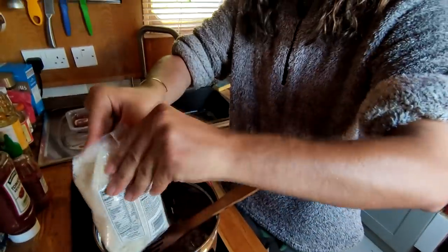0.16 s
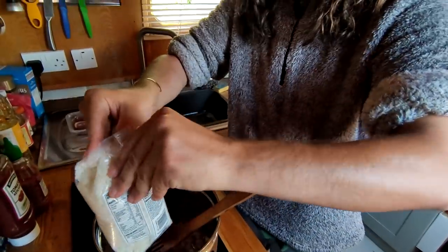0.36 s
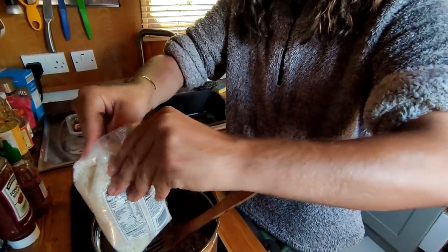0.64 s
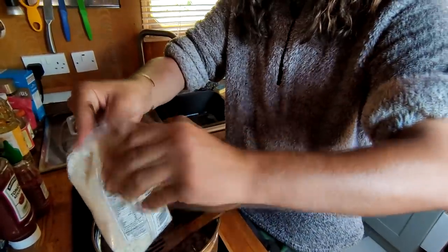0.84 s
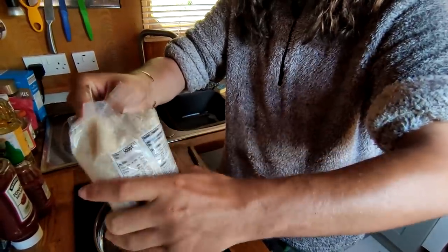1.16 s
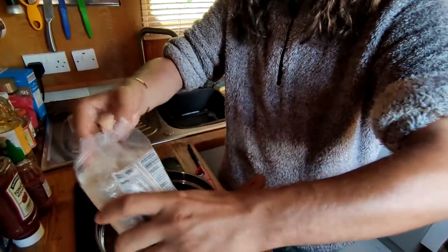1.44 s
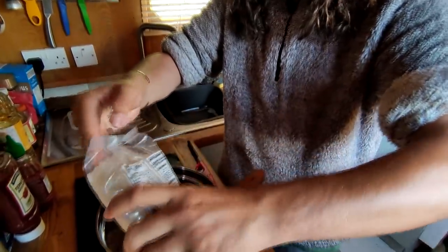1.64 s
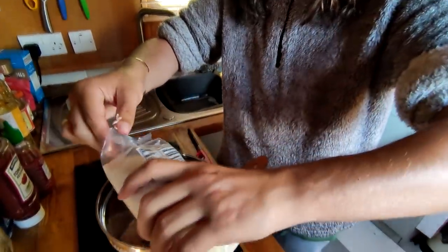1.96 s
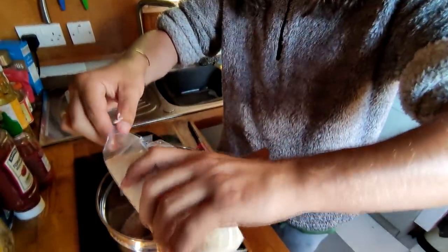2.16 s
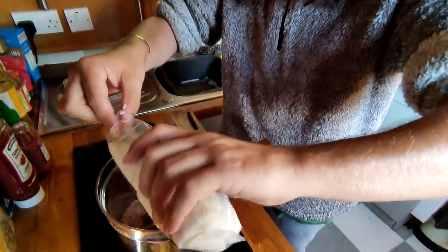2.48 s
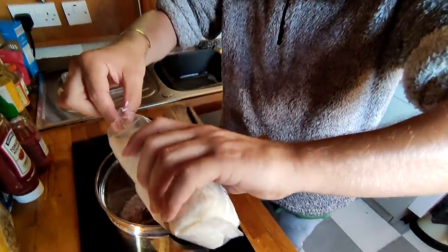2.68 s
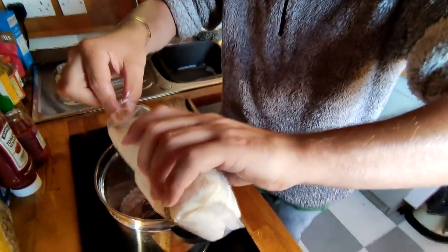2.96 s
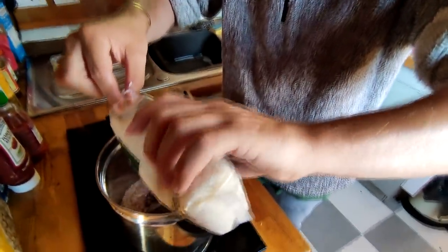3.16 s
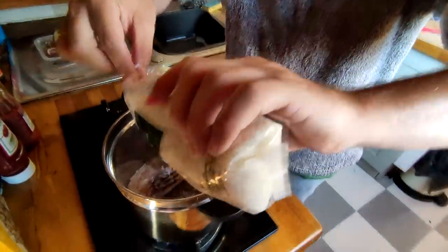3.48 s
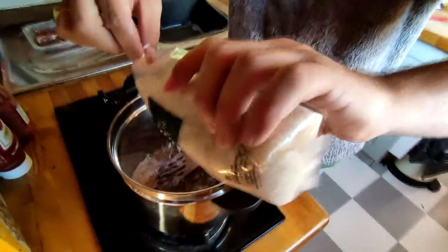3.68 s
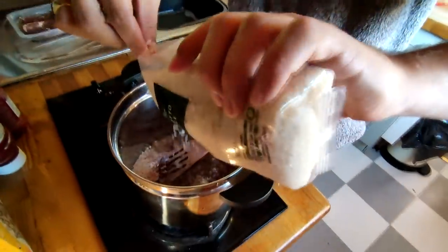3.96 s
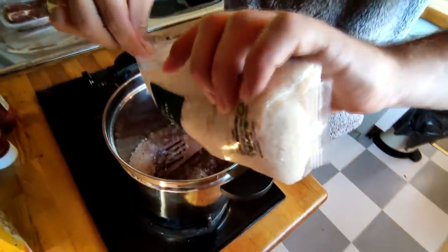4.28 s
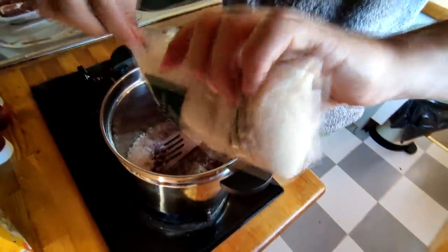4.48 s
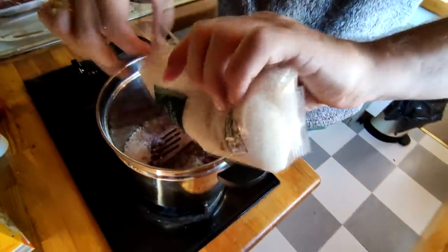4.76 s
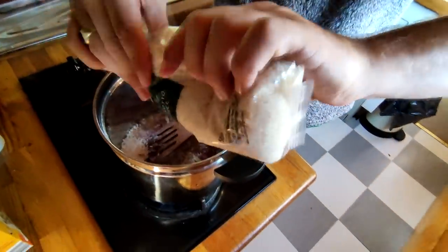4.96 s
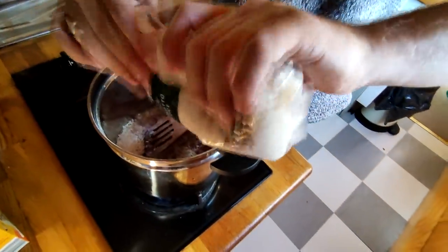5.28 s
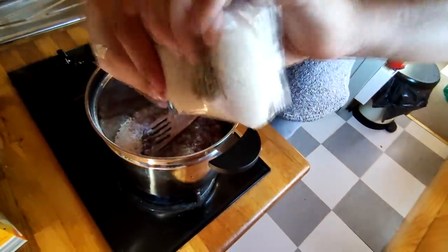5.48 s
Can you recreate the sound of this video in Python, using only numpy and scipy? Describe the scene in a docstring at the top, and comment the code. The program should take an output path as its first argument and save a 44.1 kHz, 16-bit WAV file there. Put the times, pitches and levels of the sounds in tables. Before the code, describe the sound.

Close kitchen frying hiss with spurts of hot fat, soft bag pops, a rush of rice grains, then loud crinkling plastic.

```python
"""Rice into a pot of frying onions

Heard close by in a small kitchen: rice is tipped from a plastic bag into a steel pot where onions fry.
Clouds of random clicks make the fat sizzle, flare in spurts and ring the pot, and the grains patter in.
Short damped resonances make the film buckle softly at first, then snap as the bag is gripped and lifted;
clumped clicks make it rustle. Room tone and short reflections lie around it, on two unlike ports."""
import sys
import numpy as np
from scipy import signal
from scipy.fft import rfft, irfft, next_fast_len
from scipy.io import wavfile

SR = 44100
rng = np.random.default_rng(int(sys.argv[2]) if len(sys.argv) > 2 else 0)


def log_audio(samples):
    """Write samples as a 16-bit WAV file to the path given in sys.argv[1]."""
    # one column per channel
    frames = np.atleast_2d(samples).T
    # limit to full scale, then quantise
    limited = np.clip(frames, -1, 1)
    pcm = np.round(limited * 32767).astype(np.int16)
    wavfile.write(sys.argv[1], SR, pcm)


N = 247842

# All levels in these tables are relative, unless said otherwise.
# Steady frying in the fat. Each row: time in seconds, level in dB.
FRYING = [(0.0, -34), (0.6, -36), (1.3, -30.5), (1.9, -37), (2.25, -31.5), (2.5, -34), (2.8, -31.5),
          (3.3, -31.5), (3.8, -29), (4.4, -30), (4.65, -39.5), (4.95, -32), (5.2, -31.5), (5.62, -30.5)]
# Larger spurts as something wet meets hot fat. Each row: start in seconds, level in dB,
# decay by 60 dB in seconds, extra level of the lower band (body) in dB.
FLARES = [(0.328, -25.5, 0.59, -3), (0.345, -21, 0.066, -2), (0.449, -26.5, 0.3, 0.5),
          (0.528, -33, 0.97, 9.5), (0.575, -26.5, 0.28, 4.5), (0.781, -23.5, 0.31, -3.5),
          (0.898, -29, 0.41, -2), (0.907, -18.5, 0.14, -4.5), (0.924, -28.5, 0.24, 8.5),
          (1.006, -31, 0.28, 7), (1.078, -40, 0.16, -7), (1.152, -28.0, 0.7, -13), (1.167, -33, 0.25, 5),
          (1.196, -20, 0.098, -11), (1.257, -28.5, 0.3, 7), (1.319, -33.0, 0.47, 9),
          (1.333, -31.5, 0.23, 9.5), (1.464, -28.5, 0.27, 3), (1.605, -29, 0.7, -5.5),
          (1.722, -23.5, 0.39, -8.5), (1.874, -36, 0.11, -9), (1.94, -31.5, 0.78, -11),
          (2.068, -33.5, 0.21, -12), (2.081, -28.5, 0.32, -22), (2.109, -31, 0.44, -14),
          (2.133, -22.5, 0.1, -19), (2.18, -24, 0.22, -1), (2.303, -29, 0.11, -3), (2.338, -33, 0.13, 4),
          (2.375, -27, 0.37, -8), (2.425, -26, 0.12, -8), (2.528, -32, 0.7, -9), (2.552, -26.5, 0.7, -2),
          (2.577, -28, 0.5, 3), (2.626, -28, 0.77, 1.5), (2.652, -25, 0.4, 1.5), (2.685, -27, 0.17, -1),
          (2.741, -26.0, 0.82, -1.5), (2.793, -27, 0.1, -1), (2.864, -30, 0.2, -8), (2.897, -27.5, 0.78, 1),
          (2.927, -28, 0.47, 0.5), (2.976, -24.0, 0.7, -11), (2.988, -21.5, 0.44, -8),
          (3.005, -25.5, 0.21, -1), (3.075, -24, 0.43, -12), (3.1, -25, 0.52, -7.5),
          (3.171, -22.0, 0.1, -11), (3.219, -24, 0.17, -4), (3.287, -28, 0.13, -10),
          (3.315, -28.5, 0.55, -5), (3.394, -24, 0.063, -17), (3.428, -28, 0.26, -9),
          (3.472, -27.0, 0.17, -8), (3.496, -29, 0.37, -9), (3.53, -22.5, 0.08, -7),
          (3.572, -34.0, 0.33, -2), (3.6, -28.5, 0.52, 4), (3.632, -28.5, 0.17, 4), (3.66, -31, 0.27, 6.5),
          (3.707, -26.5, 0.25, -4), (3.725, -27.5, 0.24, 2), (3.766, -26.5, 0.32, 3),
          (3.796, -24, 0.22, -1), (3.812, -26.0, 0.21, -1), (3.844, -24.5, 0.13, 3.5),
          (3.907, -25.5, 0.19, 2.5), (3.927, -26.0, 0.22, -7), (3.957, -26, 0.24, -4),
          (4.019, -32, 0.22, 7), (4.037, -31.0, 0.16, 2), (4.065, -32.5, 0.48, 7),
          (4.083, -30.5, 0.67, 9.5), (4.117, -26.5, 0.22, 3), (4.19, -25, 0.21, 5), (4.273, -31, 0.55, 1),
          (4.302, -29, 0.17, -2), (4.339, -31.5, 0.28, 3.5), (4.364, -41.0, 0.21, 2),
          (4.406, -26.5, 0.41, -2), (4.428, -32, 0.55, 9), (4.498, -26, 0.16, 4.5), (4.608, -36, 0.46, 7),
          (5.218, -31, 0.28, 9)]
# Single droplets of fat bursting. Each row: start in seconds, level in dB.
SPITS = [(0.023, -37.5), (0.107, -35), (0.119, -40), (0.227, -35), (0.239, -38), (0.294, -36), (0.492, -34),
         (0.687, -41), (0.733, -36), (0.885, -29), (1.258, -25), (4.794, -31), (5.1032, -25), (5.311, -35)]
# The stream of rice. Each row: time in seconds, flow in grains per second, level in dB.
POUR = [(0, 23.6, -57.5), (2.0, 81, -52.5), (2.2, 350, -49.5), (2.5, 120, -45), (2.62, 640, -46.5),
        (3.3, 310, -48), (3.65, 520, -46), (4.1, 440, -51), (4.45, 360, -43.5), (4.6, 85, -40),
        (5.62, 14, -53)]
# Dull pops as the full bag buckles. Each row: start in seconds, peak in dB, pitch in Hz.
BUCKLES = [(0.027, -24, 1180), (0.034, -17.5, 2290), (0.19, -24, 1670), (0.326, -19, 1380),
           (0.355, -18, 1290), (0.381, -24.5, 1510), (0.514, -26, 1270), (0.618, -23.5, 1550),
           (0.655, -14, 1220), (0.835, -26, 1450), (0.899, -27, 1080), (1.204, -23.5, 920),
           (1.237, -27, 940), (1.285, -18.5, 1280), (1.299, -29, 1050), (1.422, -29.5, 1190),
           (1.442, -18, 1060), (1.478, -31, 1300), (1.561, -23, 1440), (1.68, -23.5, 1350),
           (2.164, -26, 1530), (4.097, -17, 1825), (4.225, -32, 800), (4.377, -28.5, 730),
           (4.652, -29, 1710), (4.722, -23.5, 1140), (4.785, -34, 961), (4.857, -23, 1090),
           (5.206, -18, 1030), (5.395, -21, 1720)]
# Creases of the film snapping through. Each row: start in seconds, peak of the swing in dB, its pitch in Hz,
# crack against swing in dB, left against right in dB.
SNAPS = [(0.2868, -29, 3030, 4, 0), (3.377, -15, 3150, -3, 5), (4.5395, -13, 4500, -15, 0),
         (4.589, -17, 1040, 5, -3), (4.691, -17.5, 1910, 3.5, -1), (4.985, -26, 1800, -3, -2),
         (4.9977, -19, 1790, 4, 2), (5.021, -16, 2110, -4, -8), (5.029, -18, 2500, -2, -4),
         (5.061, -8.5, 1630, -4, 1.5), (5.064, -14, 1800, -3, 4), (5.092, -20, 1570, 0, 1),
         (5.1072, -7, 860, -3, -1.5), (5.133, -21.5, 750, -5, 5), (5.157, -10.5, 3950, 0, 5.5),
         (5.179, -17, 3350, 3, -1), (5.193, -23, 1500, 3, 2), (5.209, -24, 1180, 3, -2),
         (5.286, -19.5, 1210, -5, 4), (5.311, -32, 2000, 3, 7), (5.318, -28, 2000, 0, 2),
         (5.3296, -6, 4880, -4, 4.5), (5.434, -17, 2030, -2, 11), (5.47, -17.5, 694, 4.5, 1),
         (5.494, -12.5, 1930, 1.5, 12), (5.533, -9, 4570, 0.5, -12.5), (5.536, -14, 4600, 0, -8),
         (5.564, -15, 1510, 5.5, 6), (5.586, -22.5, 2410, 4, -3)]
# Low thumps of rice slumping inside the bag. Each row: start in seconds, peak in dB, pitch in Hz.
THUMPS = [(0.356, -34, 353), (1.183, -36.5, 330), (1.286, -40, 370), (1.561, -42, 537), (1.678, -39, 410),
          (1.904, -44.5, 337), (3.154, -48, 334), (3.376, -41.5, 390), (3.515, -40, 317.5),
          (3.993, -48.5, 252.5), (4.374, -42, 318), (4.718, -45, 244), (5.129, -30.5, 322),
          (5.192, -34.5, 234), (5.333, -37.5, 307), (5.468, -36, 290)]
# The hands squeezing the bag. Each row: start in seconds, time until release in seconds, level in dB.
SQUEEZES = [(4.478, 0.11, -33.5), (4.632, 0.04, -43.5), (4.702, 0.029, -37), (4.776, 0.096, -37.5),
            (4.975, 0.048, -31.5), (5.092, 0.13, -36), (5.275, 0.086, -32.5), (5.392, .012, -33.5),
            (5.46, 0.032, -32), (5.523, 0.066, -30.5)]
# Colour of the frying fat. Each row: frequency in Hz, gain in dB.
FRYING_COLOUR = [(300, -0.5), (700, -7), (1300, -4), (2200, 13.5), (3400, 13.5), (4600, 15.5), (5400, 7),
                 (6500, -5.5), (8400, 16.5), (9450, 8.5), (10200, 15.5), (12300, 15.5), (14000, 6),
                 (16000, 16.5)]
# Colour of the simmering onions. Each row: frequency in Hz, gain in dB.
SIMMER_COLOUR = [(300, -11), (1300, -0.5), (2200, -0.5), (4600, 0.5), (16000, -12.5)]
# Colour of the spurts. Each row: frequency in Hz, gain in dB.
FLARE_COLOUR = [(1000, -17), (2500, -12), (3600, -13), (4600, -3), (5400, -3.5), (6300, 5), (7200, 4.5),
                (8400, 6.5), (8900, 5.5), (9450, 0.5), (10200, 3.5), (12300, 5.5), (14000, 0), (16000, -5)]
# Colour of the landing grains. Each row: frequency in Hz, gain in dB.
GRAIN_COLOUR = [(400, -14), (900, 8), (1500, 14), (2200, 13), (3200, 4), (5000, -3), (16000, 0)]
# Colour of the rustling film. Each row: frequency in Hz, gain in dB.
BAG_COLOUR = [(59, -11), (100, -7), (224, -2.5), (398, 4.5), (502, -7.5), (721, 5.5), (1280, 3),
              (1760, 4.5), (2990, -0.5), (4570, 1), (8460, -12), (9610, -38), (13200, -4), (16000, -23)]
# Colour of the kitchen's room tone. Each row: frequency in Hz, gain in dB.
ROOM_COLOUR = [(15, -74), (25, -15.5), (102, 5), (270, -2.5), (401, 7), (484, -5.5), (626, -7.5),
               (694, -2.5), (913, -4.5), (1140, -8.5), (1310, 2), (1500, 3.5), (1950, -28), (3300, -120)]
# Colour of the bursting droplets. Each row: frequency in Hz, gain in dB.
SPIT_COLOUR = [(2000, -29), (7500, -5), (11500, -1), (16000, -12.5)]
# Colour of grains on bare steel. Each row: frequency in Hz, gain in dB.
TICK_COLOUR = [(2500, -30), (6500, -3), (8400, 0), (12500, 0), (16000, -6), (18000, -40)]
# Ringing modes of the steel pot. Each row: frequency in Hz, strength in dB.
POT_MODES = [(2080, -62), (3811, -63), (4457, -60), (4791, -58), (4942, -61), (5249, -61), (5543, -57),
             (5760, -59), (5959, -61), (6085, -58), (6643, -51), (7068, -57), (7365, -57), (7410, -56),
             (8341, -54), (8509, -57), (8611, -57), (9007, -55), (10298, -61), (11079, -53), (11640, -55),
             (12658, -54), (12889, -54), (13657, -57), (14476, -60), (14745, -58), (15194, -59),
             (15722, -60)]
# Unlike colour of the two microphone ports. Each row: frequency in Hz, left against right in dB.
PORTS = [(100, 1), (250, -2), (700, -0.5), (2000, 3), (4000, 2.5), (6500, 5.5), (8500, 12), (9500, -3.5),
         (10600, -13), (12000, -12.5), (15500, -7.5)]

FULL_FLOW_PER_S = 500  # flow of rice at which spurts and ticks have their nominal level


def from_db(db):
    """Decibels to gain."""
    return 10 ** (np.asarray(db) / 20)


def rms_one(x):
    """Scale to unit power."""
    return x / np.sqrt(np.mean(x ** 2) + 1e-20)


def in_time(rows):
    """Each column of a timed table, after the first, drawn as a curve at every sample."""
    s, *columns = np.transpose(rows)
    return [np.interp(np.arange(N) / SR, s, column) for column in columns]


def add(out, s, sound):
    """Mix a sound in at a time in seconds."""
    start = max(round(s * SR), 0)
    out[..., start:start + sound.shape[-1]] += sound[..., :max(N - start, 0)]


def drift(rate):
    """Smooth random wander with a spread of one, through this many new values a second."""
    knots = rng.standard_normal(N // 20)
    return rms_one(np.interp(np.arange(N) / SR * rate, np.arange(len(knots)), knots))


def filtered(x, spectrum):
    """Causal (minimum-phase) filter with the given gains, built by folding the cepstrum."""
    size = 2 * next_fast_len(N // 2 + SR // 10, real=True)
    table_hz, table_db = np.transpose(spectrum)
    hz = np.arange(size // 2 + 1) * SR / size + 1  # 1 Hz up, to keep the logarithm finite
    log_gain = np.log(from_db(np.interp(np.log(hz), np.log(table_hz), table_db)))
    cepstrum = irfft(log_gain)[:size // 2]
    response = np.exp(2 * rfft(cepstrum, size) - cepstrum[0])
    return irfft(rfft(x, size) * response, size)[..., :N]


def coloured(x, spectrum):
    """Give a white sound a colour and keep its power."""
    return rms_one(filtered(x, spectrum)) * np.sqrt(np.mean(x ** 2))


def resonance(x, hz, width_hz):
    """One damped resonance with a gain of about one at its top."""
    r = np.exp(-np.pi * width_hz / SR)
    zeros = np.array([1, 0, -1]) * (1 - r * r) / 2
    poles = [1, -2 * r * np.cos(2 * np.pi * hz / SR), r * r]
    return signal.lfilter(zeros, poles, x + 1e-18)


def grains(per_s, spread_db, scatter):
    """Random clicks of uneven size, each with its own left-right balance; stereo, unit power."""
    size_db = spread_db * np.minimum(rng.exponential(1, N), 4)
    sizes = from_db(size_db) * rng.choice([-1, 1], N)
    born = rng.random(N) < per_s / SR
    balance = 1 + scatter * rng.standard_normal((2, N))
    # the root keeps the power even while the rate varies
    return rms_one(born * sizes / np.sqrt(per_s) * balance)


def echoes(x, t60, delay_s):
    """Dense reflections dying away by 60 dB in t60 seconds, different at each port; about the same power."""
    t = np.arange(int(t60 * SR)) / SR
    tail = rng.standard_normal((2, len(t))) * from_db(-60 * t / t60) * (t > delay_s)
    return signal.oaconvolve(x, tail / np.sqrt(np.sum(tail ** 2) / 2), axes=-1)[:, :N]


def from_right(x, count):
    """A sound from the right reaches the left port this many samples late."""
    return np.array([np.pad(x[0], (count, 0))[:N], x[1]])


def in_pot(x, spectrum, ring_db, wall_db):
    """Sound in the pot: direct, bounced off the walls as it wanders over the base, ringing in the steel."""
    spots = np.array([drift(rate=14) for spot in range(3)])
    shares = spots / np.linalg.norm(spots, axis=0)
    walls = sum(echoes(x * share, t60=0.035, delay_s=0.00081) for share in shares)
    bounced = rms_one(x + from_db(wall_db) * walls)
    tap = signal.unit_impulse(SR // 10)
    ring = sum(from_db(db) * resonance(tap, hz, width_hz=32) for hz, db in POT_MODES)
    steel = rms_one(signal.oaconvolve(x, ring[None], axes=-1)[:, :N])
    return (coloured(bounced, spectrum) + from_db(ring_db) * steel) * np.sqrt(np.mean(x ** 2))


def crease(hz, damping, chatter, settle_s):
    """A patch of film flips and swings briefly while smaller folds settle around it; stereo, peak one."""
    t = np.arange(SR // 12) / SR
    folds = rng.standard_normal(len(t)) + .45 * rng.standard_normal((2, len(t)))
    push = chatter * folds * np.exp(-t / settle_s)
    push[:, 0] = 1  # the flip itself
    swing = resonance(resonance(push, hz, hz * damping), hz, hz * damping * 2)
    return swing / np.max(np.abs(swing))


def room_tone(level_db, width):
    """The low, even rush of the kitchen: coloured noise, mostly alike at both ports."""
    mid, side = rng.standard_normal((2, N))
    stereo = mid + width * side * np.array([[1], [-1]])
    return from_db(level_db) * coloured(stereo, ROOM_COLOUR)


def simmer(level_db):
    """The onions simmer with a duller, even hiss of dense random clicks."""
    return from_db(level_db) * coloured(grains(per_s=20000, spread_db=5.5, scatter=3.7), SIMMER_COLOUR)


def frying(level_db, flutter_db):
    """Thousands of tiny steam bubbles burst in the fat, in uneven clumps."""
    level, = in_time(FRYING)
    bubbles = grains(per_s=24000, spread_db=4, scatter=2.85)
    bursts = bubbles * from_db(level + level_db + flutter_db * drift(90))
    return in_pot(bursts, FRYING_COLOUR, ring_db=-4, wall_db=1.0)


def spits(level_db, decay_s):
    """Lone droplets burst with a thin tick of fast-fading noise."""
    t, out = np.arange(SR // 20) / SR, np.zeros((2, N))
    for s, db in SPITS:
        add(out, s, from_db(db + level_db) * np.exp(-t / decay_s) * rng.standard_normal((2, len(t))))
    return coloured(out, SPIT_COLOUR)


def small_spurts(grains_per_spurt, level_db, spread_db, t60_s):
    """The stream lands in little clumps, more and louder as the flow grows; rows as in FLARES."""
    flow = np.maximum(in_time(POUR)[0], 1)
    clumps = np.cumsum(flow) / SR / grains_per_spurt  # clumps landed so far
    late, size, body = rng.standard_normal((N // 1000, 3)).T
    turn = np.arange(len(late)) + .5 + late / np.pi  # uneven spacing
    flow_db = 10 * np.log10(np.interp(turn, clumps, flow) / FULL_FLOW_PER_S)
    db = level_db + flow_db + spread_db * size
    starts = np.searchsorted(clumps, turn) / SR
    rows = np.transpose([starts, db, np.full(len(db), t60_s), spread_db * body])
    return list(rows[turn < clumps[-1]])


def flares(level_db, puff_db, flutter_db, lag_s, split_hz):
    """Each spurt starts with a brief puff of steam and fizzes away; coarse bubbles give it body."""
    attack_s, puff_s = .0013, .008
    power = np.zeros((2, N))  # below and above the split
    small = small_spurts(grains_per_spurt=7, level_db=-37, spread_db=2, t60_s=.04)
    for s, db, t60, body_db in list(FLARES) + small:
        t = np.arange(int(t60 * SR)) / SR
        fizz = from_db(-60 * t / t60)
        puff = from_db(puff_db) * np.exp(-t / puff_s)
        swell = (1 - np.exp(-t / attack_s)) * (fizz + puff)
        add(power, s + lag_s, (swell * from_db([[db + body_db], [db]])) ** 2)
    bursts = grains(per_s=30000, spread_db=3, scatter=1.8) * from_db(level_db + flutter_db * drift(220))
    coarse = signal.sosfiltfilt(signal.butter(2, split_hz, fs=SR, output="sos"), bursts)
    boil = coarse * np.sqrt(power[0]) + (bursts - coarse) * np.sqrt(power[1])
    return in_pot(boil, FLARE_COLOUR, ring_db=-10, wall_db=-2)


def ticks(level_db, share, decay_s):
    """Some grains strike bare hot steel and add a fine, bright tick."""
    flow, t = np.maximum(in_time(POUR)[0], 1), np.arange(SR // 50) / SR
    born = np.flatnonzero(rng.random(N) < share * flow / SR)
    out = np.zeros((2, N))
    for i in born:
        size_db = level_db + 10 * np.log10(flow[i] / FULL_FLOW_PER_S) + rng.uniform(-4, 4)
        add(out, i / SR, from_db(size_db) * np.exp(-t / decay_s) * rng.standard_normal((2, len(t))))
    return coloured(out, TICK_COLOUR)


def rice(spread_db):
    """Hard grains land one by one on the steel and on the onions, as clicks heard through the pot."""
    per_s, level = in_time(POUR)
    hits = grains(np.maximum(per_s, 1), spread_db, scatter=0.26) * from_db(level)
    return in_pot(hits, GRAIN_COLOUR, ring_db=-12, wall_db=-2)


def sliding(end_db, hz, width_hz, rise_db_per_s):
    """Rice slides inside the bag with a soft, resonant rumble that grows as the bag tips."""
    swell = from_db(end_db + rise_db_per_s * (np.arange(N) - N) / SR)
    rubbing = grains(per_s=390, spread_db=4.0, scatter=0.35)
    return swell * rms_one(resonance(resonance(rubbing, hz, width_hz), hz, width_hz))


def thumps(level_db, heave_hz, heave_db, lag_s):
    """The weight of the rice pushes out a side of the bag, and the whole bag heaves with it."""
    out = np.zeros((2, N))
    for s, db, hz in THUMPS:
        side = crease(hz, damping=0.47, chatter=0.055, settle_s=0.007)
        heave = crease(heave_hz, damping=0.43, chatter=0.0087, settle_s=0.0059)
        add(out, s + lag_s, from_db(db + level_db) * (side + from_db(heave_db) * heave))
    return out


def buckles(level_db, tick_hz, tick_db, lag_s):
    """Broad folds give way with a heavily damped pop and a higher tick."""
    out = np.zeros((2, N))
    for s, db, hz in BUCKLES:
        pop = crease(hz, damping=0.77, chatter=0.045, settle_s=0.01)
        tick = crease(tick_hz, damping=0.73, chatter=0.058, settle_s=0.0067)
        add(out, s + lag_s, from_db(db + level_db) * (pop + from_db(tick_db) * tick))
    return out


def rustle(level_db, clump_db):
    """Countless small folds crackle in clumps while the bag is squeezed."""
    attack_s, release_s = .016, .022
    t, grip = np.arange(SR // 2) / SR, np.zeros(N)
    for s, hold_s, db in SQUEEZES:
        closing = np.minimum(t / attack_s, 1)
        letting_go = np.exp(-np.maximum(t - hold_s, 0) / release_s)
        add(grip, s, from_db(db) * closing * letting_go)
    clumps = from_db(clump_db * np.tanh(drift(200)))
    folds = rms_one(grains(per_s=2000, spread_db=2.0, scatter=0.74) * clumps)
    return coloured(folds * grip * from_db(level_db), BAG_COLOUR)


def snaps(level_db, crack_hz, edge_db, edge_hz, thud_db, thud_hz, lag_s):
    """Tight creases snap with a sharp crack over the swing of the film."""
    out = np.zeros((2, N))
    for s, db, hz, crack_db, pan_db in SNAPS:
        swing = crease(hz, damping=.7, chatter=.16, settle_s=.0018)
        crack = crease(crack_hz, damping=1.0, chatter=0.45, settle_s=0.0014)
        thud = crease(thud_hz, damping=0.95, chatter=0.04, settle_s=0.013)
        edge = crease(edge_hz, damping=0.43, chatter=0.29, settle_s=0.00092)
        sharp = from_db(crack_db) * (crack + from_db(edge_db) * edge)
        snap = swing + sharp + from_db(thud_db) * thud
        add(out, s + lag_s, snap * from_db(db + level_db + np.array([[pan_db], [-pan_db]]) / 2))
    return out


def scene():
    """Pot and bag close by, with the kitchen answering."""
    room = room_tone(level_db=-52, width=0.23)

    pot = simmer(level_db=-47.5) + frying(level_db=-3.4, flutter_db=3.0)
    pot = pot + spits(level_db=10.5, decay_s=0.0021)
    pot = pot + flares(level_db=-2.0, puff_db=5.0, flutter_db=0.5, lag_s=0.0001, split_hz=8600)
    pot = pot + ticks(level_db=-24.5, share=.16, decay_s=.0008) + rice(spread_db=1.5)

    bag = thumps(level_db=9.0, heave_hz=211, heave_db=-12.0, lag_s=0.0011)
    bag = bag + buckles(level_db=1.5, tick_hz=2720, tick_db=-2.5, lag_s=0.00143)
    bag = from_right(bag, count=4)
    bag = bag + sliding(end_db=-48.5, hz=196, width_hz=160, rise_db_per_s=6.0)
    bag = bag + rustle(level_db=2.5, clump_db=5.0)
    bag = bag + snaps(level_db=0.0, crack_hz=5700, edge_db=-3.0, edge_hz=12300,
                      thud_db=-24.0, thud_hz=307, lag_s=0.0012)

    walls = echoes(from_db(-7.5) * bag + from_db(-7) * pot, t60=.2, delay_s=0.00214)
    return from_right(pot, count=4) + bag + walls + from_right(room, count=4)


def record(dry):
    """Each microphone port adds its colour; a steep low-pass cuts the top."""
    hz, tilt_db = np.transpose(PORTS)
    shared_db = 10 * np.log10((1 + from_db(2 * tilt_db)) / 2)  # keeps the mean power of the two gains at one
    left = filtered(dry[0], np.transpose([hz, tilt_db - shared_db]))
    right = filtered(dry[1], np.transpose([hz, -shared_db]))
    low_pass = signal.ellip(12, .1, 80, 15850, fs=SR, output="sos")  # order, ripple dB, stop dB, cutoff Hz
    return signal.sosfilt(low_pass, [left, right])


dry = scene()
out = record(dry)
log_audio(out)
```